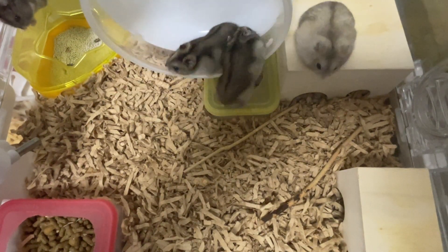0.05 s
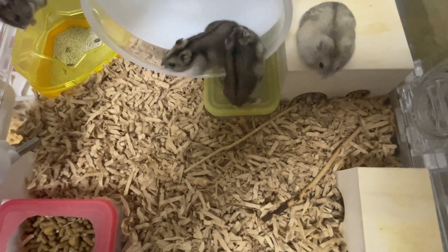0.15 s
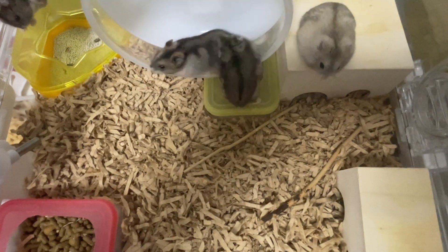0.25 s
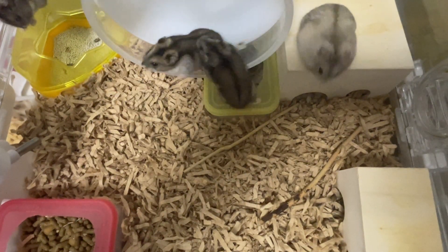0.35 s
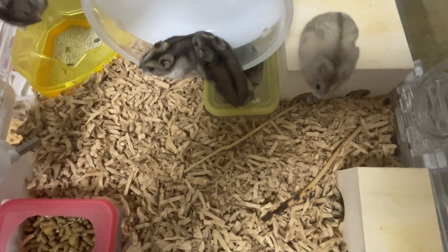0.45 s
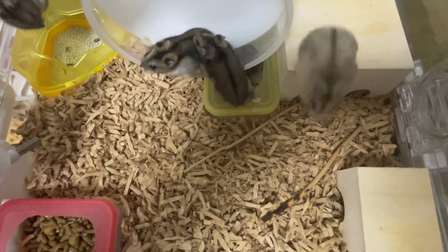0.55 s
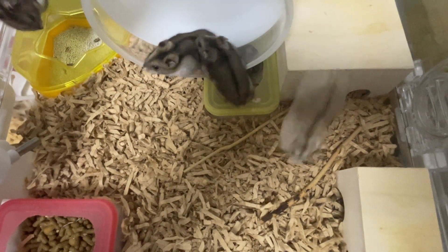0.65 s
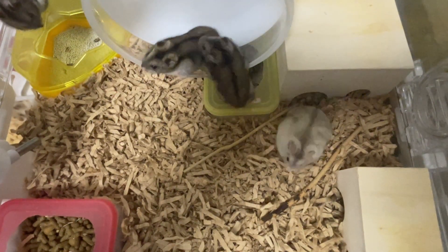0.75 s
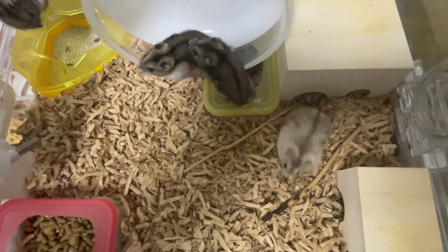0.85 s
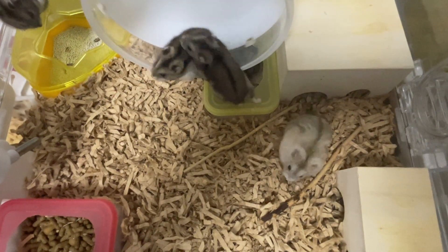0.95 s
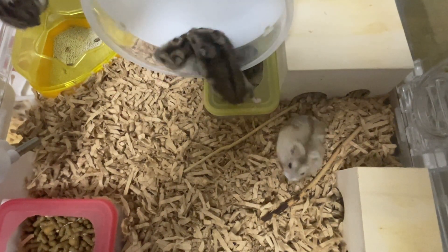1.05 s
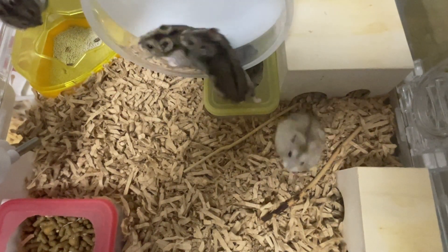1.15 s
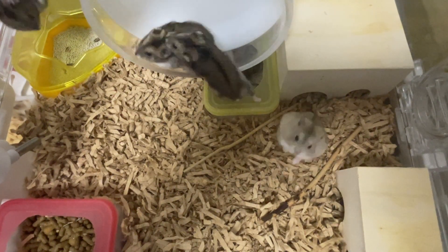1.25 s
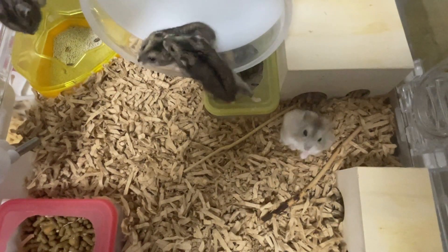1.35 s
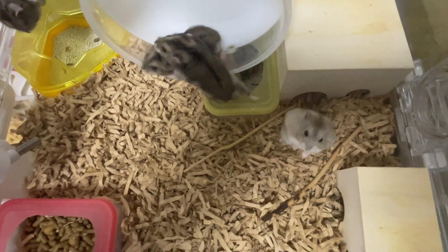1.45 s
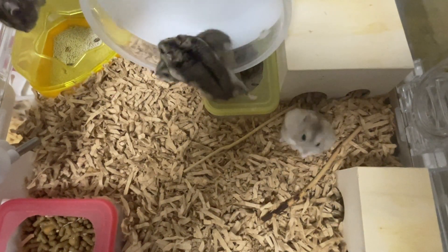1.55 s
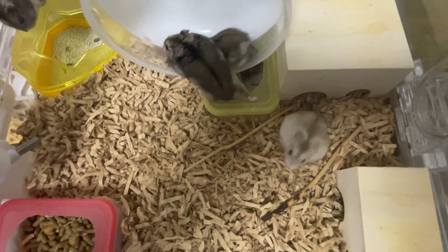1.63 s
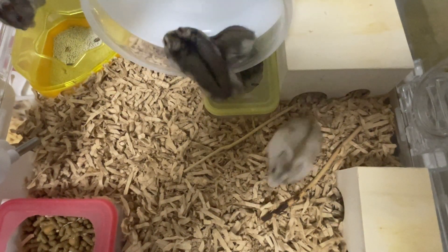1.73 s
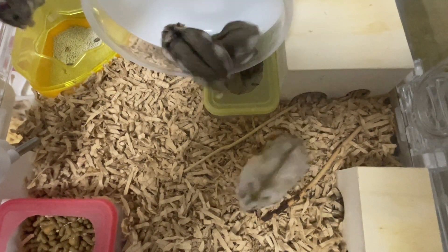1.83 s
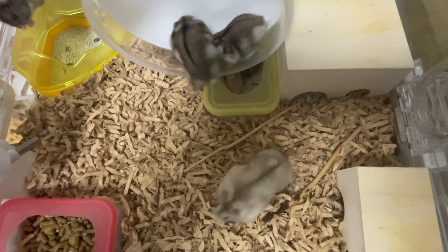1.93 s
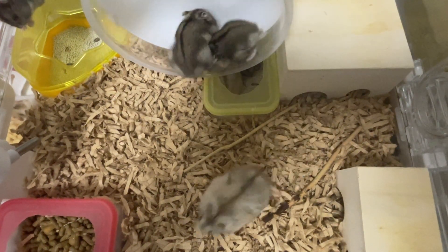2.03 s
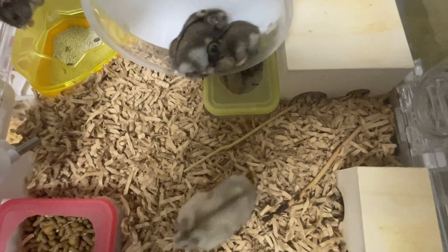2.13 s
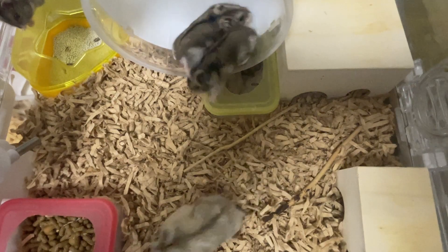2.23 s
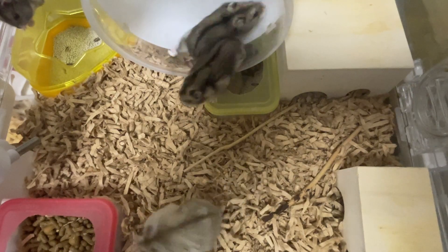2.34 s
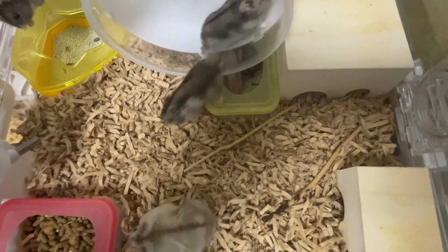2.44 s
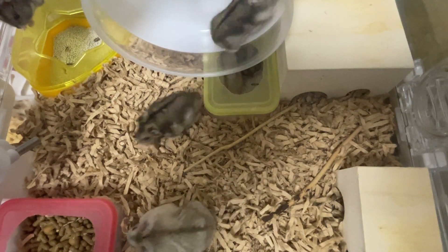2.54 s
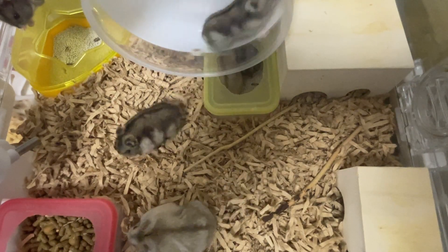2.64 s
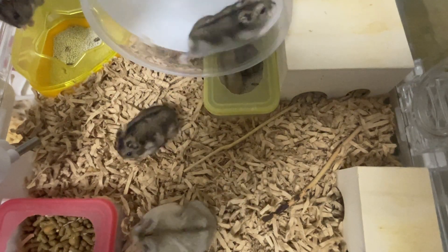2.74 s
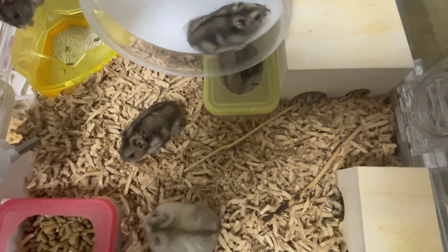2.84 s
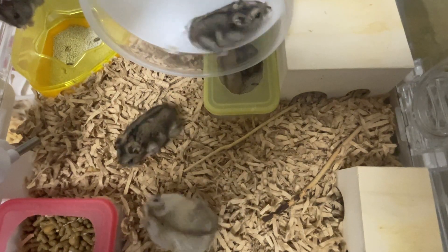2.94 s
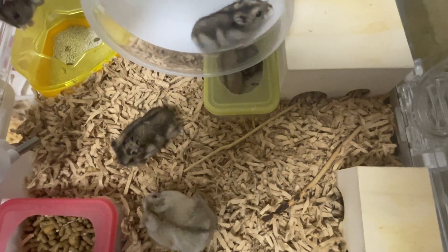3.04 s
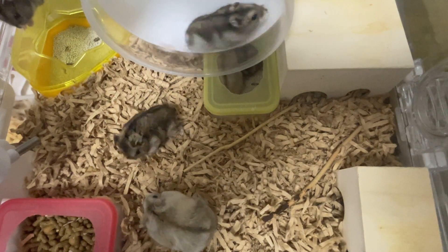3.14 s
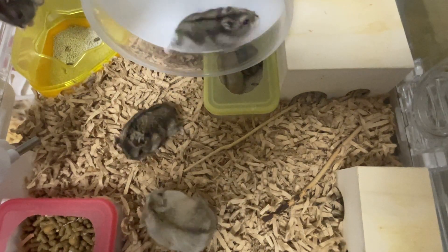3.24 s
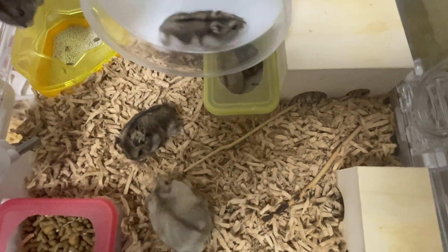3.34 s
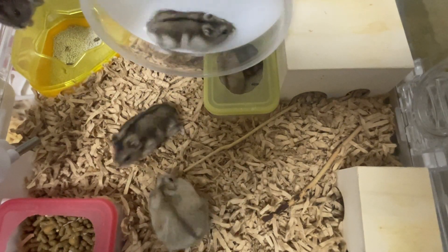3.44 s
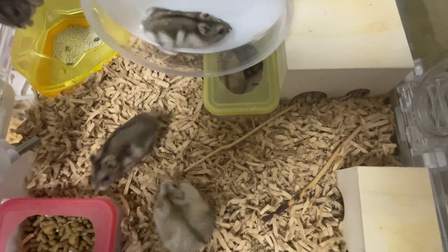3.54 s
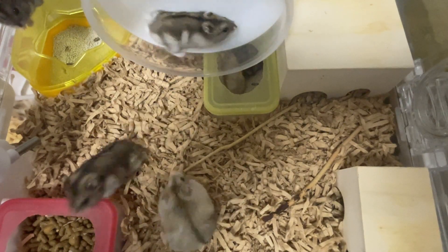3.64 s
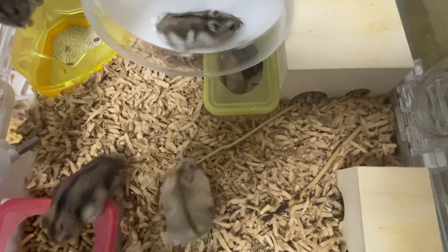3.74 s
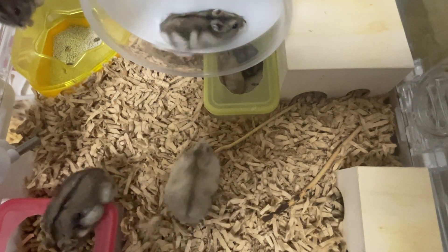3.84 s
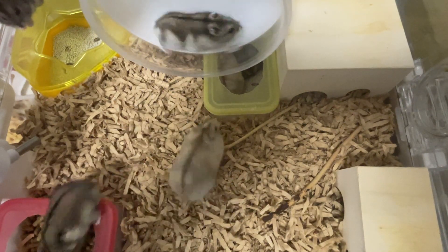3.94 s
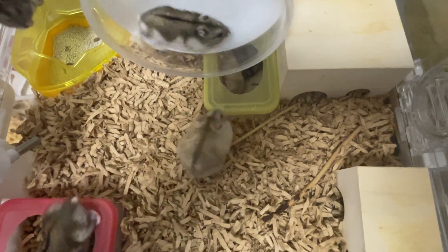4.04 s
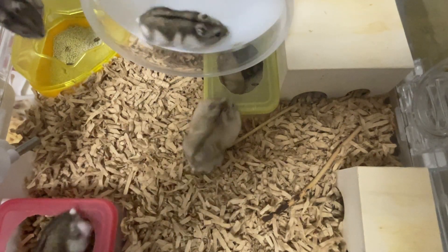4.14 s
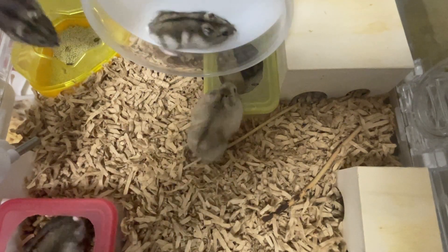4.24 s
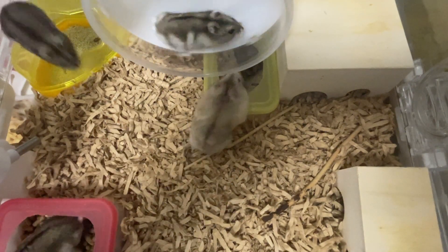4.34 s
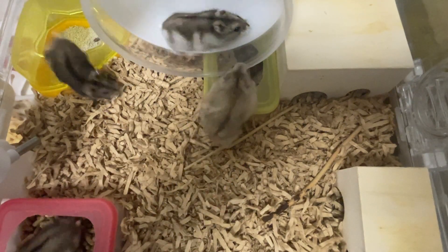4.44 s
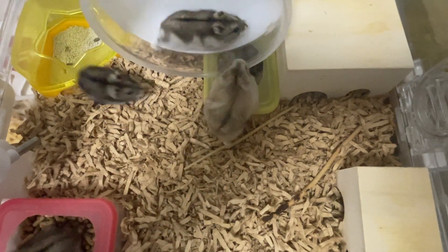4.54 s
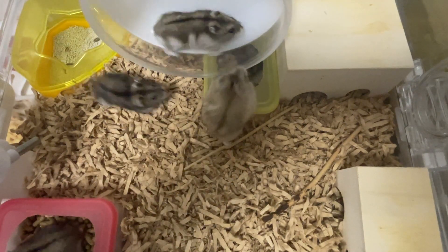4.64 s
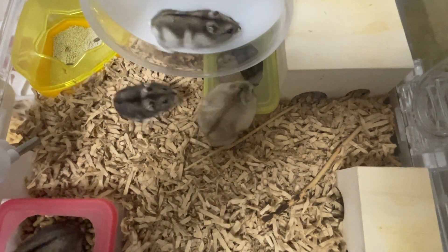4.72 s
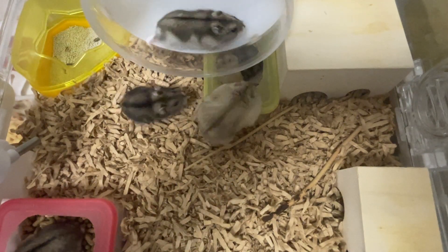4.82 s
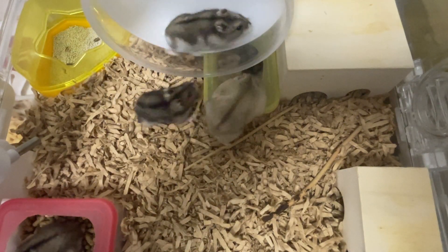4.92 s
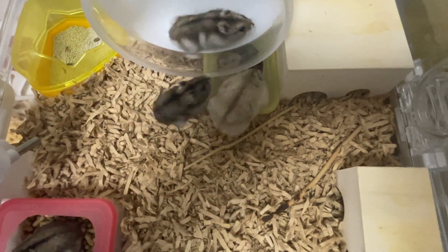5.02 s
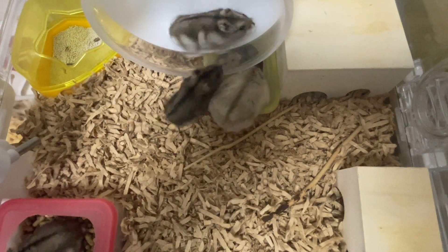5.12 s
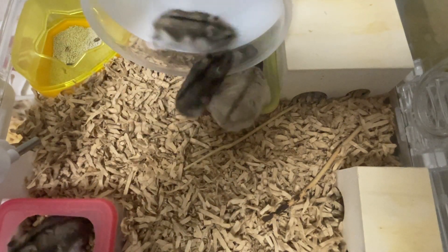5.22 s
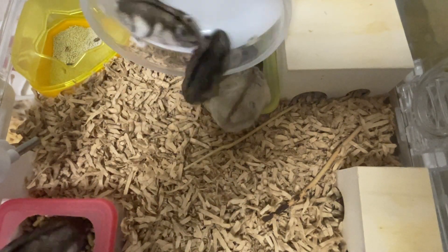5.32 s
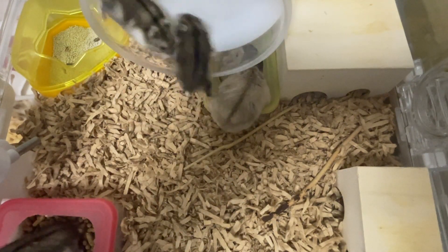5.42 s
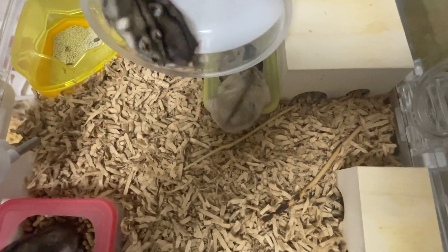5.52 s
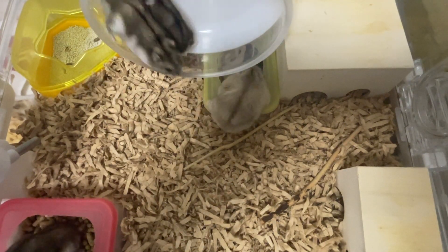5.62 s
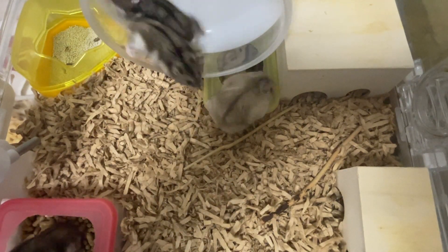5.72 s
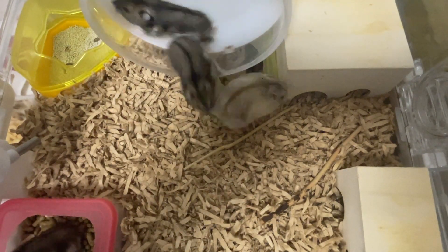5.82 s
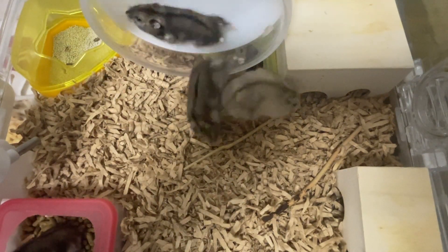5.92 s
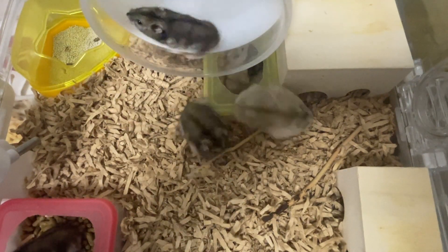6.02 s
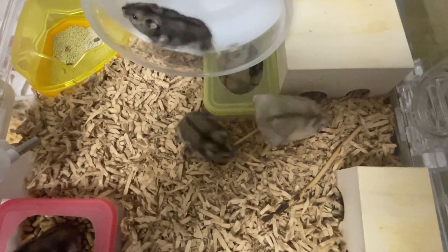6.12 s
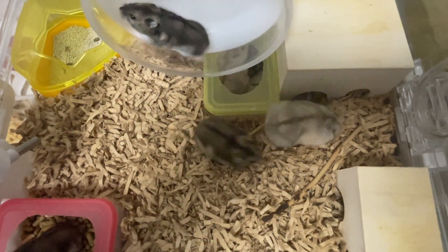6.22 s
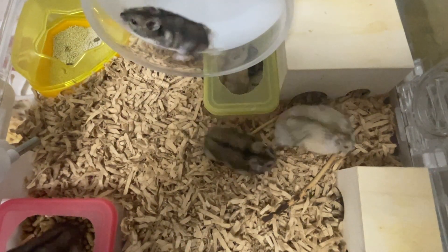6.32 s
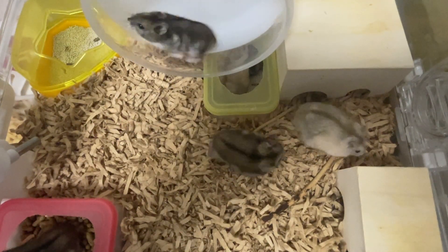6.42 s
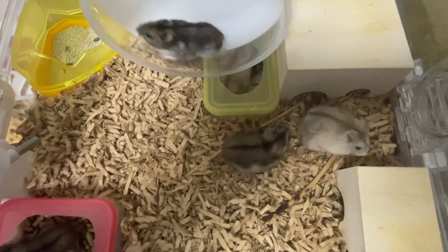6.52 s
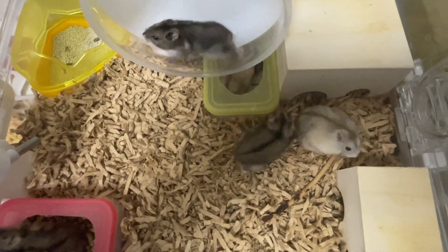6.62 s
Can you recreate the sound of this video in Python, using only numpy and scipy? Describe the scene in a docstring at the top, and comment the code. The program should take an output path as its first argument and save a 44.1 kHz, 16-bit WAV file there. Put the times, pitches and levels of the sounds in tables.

```python
"""Short hollow knocks and a dying rumble come first, then dry rustling, a hop's thud and claw ticks.
Dwarf hamsters are heard from close above: struck surfaces and floor decay as damped tones, while chips in the
bedding and air resonances are excited by random contacts. One animal jostles, then gallops on a plastic saucer
wheel: its footfalls drive the stand's resonances, its paws slap the dish and its claws tick. A faint hum persists.
Table levels are source levels, before filters, echo and the output trim."""
import sys
import numpy as np
from scipy import signal
from scipy.fft import rfft, irfft, next_fast_len
from scipy.io import wavfile
from scipy.ndimage import uniform_filter1d

SR = 44100
rng = np.random.default_rng(int(sys.argv[2]) if len(sys.argv) > 2 else 0)


def generate_wav(sig):
    """Save sig (samples, or channels by samples) to the path in sys.argv[1] as 16-bit PCM at SR."""
    pcm = np.round(np.clip(np.atleast_2d(sig).T, -1, 1) * 32767).astype(np.int16)
    wavfile.write(sys.argv[1], SR, pcm)


N = 294147
TIME = np.arange(N) / SR
AGE = np.arange(SR // 5) / SR  # window of one short event, s


def from_db(db):
    """Logarithmic level: decibels to amplitude gain."""
    return 10 ** (np.asarray(db) / 20)


def rms_one(x):
    """Normalisation: scale a signal to unit rms."""
    return x / np.sqrt(np.mean(x ** 2) + 1e-20)


def curve_at(rows, s):
    """Linear interpolation: read a (t, value) curve at the given times."""
    return np.interp(s, *np.transpose(rows))


def gains_in_time(rows):
    """Amplitude modulation: each dB column of a curve as a gain per sample."""
    s, *columns = np.transpose(rows)
    return [from_db(np.interp(TIME, s, column)) for column in columns]


def colour(x, points):
    """Minimum-phase filtering: a causal response with the given dB spectrum, via the folded cepstrum."""
    size = next_fast_len(N + 8192, real=True)
    hz, db = np.transpose(points)
    grid = np.maximum(np.fft.rfftfreq(size, 1 / SR), 1)
    log_gain = np.log(from_db(np.interp(np.log(grid), np.log(hz), db)))
    cepstrum = irfft(log_gain, size)
    cepstrum[1:size // 2] *= 2
    cepstrum[size // 2 + 1:] = 0
    response = np.exp(rfft(cepstrum))
    return irfft(rfft(x, size) * response, size)[..., :N]


def ring(x, hz, t60):
    """Damped resonance: a unit click excites a decaying sine of height about 1."""
    radius = from_db(-60 / (t60 * SR))
    angle = 2 * np.pi * hz / SR
    poles = [1, -2 * radius * np.cos(angle), radius * radius]
    return signal.lfilter([0, np.sin(angle)], poles, x + 1e-18)


def tone(hz):
    """Phase accumulation: a sine that follows a pitch given per sample."""
    return np.sin(2 * np.pi * np.cumsum(hz) / SR)


def swell(width):
    """Gaussian envelope: a smooth bump of height 1, centred in its window."""
    return np.exp(-.5 * np.minimum(((AGE - AGE[-1] / 2) / width) ** 2, 100))


def strike(rise, decay):
    """Impact envelope: fast rise and exponential fall, height 1, starting mid-window."""
    age = np.maximum(AGE - AGE[-1] / 2, 0)
    shape = (1 - np.exp(-age / rise)) * np.exp(-age / decay)
    return shape / shape.max()


def envelope(events):
    """Incoherent addition: sum the powers of (s, dB, shape) events and return the amplitude."""
    power = np.zeros(N + 2 * len(AGE))
    for s, db, shape in events:
        start = max(int(s * SR), 0)
        power[start:start + len(shape)] += (from_db(db) * shape) ** 2
    return np.sqrt(power[len(AGE) // 2:][:N])


def evened(x, seconds):
    """Automatic gain: divide by the local rms, keeping texture while the level stays near 1."""
    size = max(int(seconds * SR), 2)
    power = uniform_filter1d(uniform_filter1d(x ** 2, size), size)
    return x / np.sqrt(power + 1e-12)


def grains(per_s, spread_db, decay):
    """Shot noise: random contacts of uneven size, each a decaying noise burst; mid and side."""
    sizes = from_db(spread_db * np.minimum(rng.exponential(1, N), 4))
    energy = (rng.random(N) < per_s / SR) * sizes ** 2
    energy = signal.lfilter([1], [1, -np.exp(-2 / (decay * SR))], energy + 1e-18)
    return np.sqrt(energy) * rng.standard_normal((2, N))


# lowest and highest pitch of the loose pieces (Hz)
CHIP_LOW_HZ, CHIP_HIGH_HZ = 1170, 13530


def chatter(per_s, spread_db, t60):
    """Random modal excitation: uneven snaps each ring a piece at its own pitch; mid and side."""
    snaps = rng.random((int(per_s * N / SR), 5))
    hz = CHIP_LOW_HZ * (CHIP_HIGH_HZ / CHIP_LOW_HZ) ** snaps[:, 1:2]
    size = from_db(spread_db * np.minimum(-np.log(1 - snaps[:, 2:3]), 4)) * hz ** 0.14
    lag = np.arange(SR // 80)
    life = t60 * np.sqrt(CHIP_LOW_HZ / hz)  # higher pieces ring shorter
    decay = np.exp(-np.log(1000) * lag / (life * SR))
    rings = size * decay * np.sin(2 * np.pi * hz * lag / SR)
    at = ((snaps[:, :1] * N).astype(int) + lag).ravel()
    signs = np.sign(snaps[:, 3:].T - .5)
    return np.array([np.bincount(at, (rings * sign[:, None]).ravel(), N)[:N] for sign in signs])


PING_RISE_S = 0.0017  # time constant of the build-up


def pings(hits, low_hz, high_hz, t60, count):
    """Modal excitation: each (s, dB) hit rings a few short modes drawn at random; mid and side."""
    out = np.zeros((2, N + len(AGE)))
    for s, db in hits:
        hz = low_hz * (high_hz / low_hz) ** ((np.arange(count) + rng.random(count)) / count)
        fade = from_db(db - 60 * AGE / t60) * (1 - np.exp(-AGE / PING_RISE_S))
        modes = np.sin(2 * np.pi * np.outer(hz, AGE)) * fade
        start = int(s * SR)
        out[:, start:start + len(AGE)] += rng.choice([-1, 1], (2, count)) @ modes
    return out[:, :N]


def cage(x, echo_db, t60):
    """Reverberation: close walls add a short dense echo, different for mid and side."""
    age = np.arange(SR // 8) / SR
    echo = rng.standard_normal((2, len(age))) * from_db(-60 * age / t60) * (age > .001)
    echo /= np.sqrt(np.sum(echo ** 2, axis=1, keepdims=True))
    wet = from_db(echo_db)
    return (x + wet * signal.fftconvolve(x, echo, axes=1)[:, :N]) / np.sqrt(1 + wet ** 2)


# modes of the plastic dish: f/Hz, bandwidth/Hz, level/dB
DISH_MODES = [(417.5, 45, 7.5), (551, 6.7, 0.5), (703, 36, 6), (920, 18, -1), (987, 13, 8), (1150, 20, 4.5),
              (1329, 23, 0.5), (1530, 14.5, 8), (1640, 26, 6), (2140, 36, -4.5), (2603, 41, -16),
              (3470, 35, -2), (4163, 240, 7)]


def dish(x):
    """Modal resonance: the dish lifts its own modes out of whatever shakes it."""
    out = x.copy()
    for hz, width, db in DISH_MODES:
        r = np.exp(-np.pi * width / SR)
        zeros = np.array([1, 0, -1]) * (1 - r * r) / 2
        poles = [1, -2 * r * np.cos(2 * np.pi * hz / SR), r * r]
        out += from_db(db) * signal.lfilter(zeros, poles, x + 1e-18)
    return out


# spectrum of the room hum: f/Hz, relative level/dB
HUM = [(20, -8), (45, -3), (75, 4.5), (120, -2), (175, 0.5), (250, -12.5), (480, -20.5), (650, -28),
       (850, -25.5), (2000, -32), (6000, -46), (14000, -66)]
HUM_DB = -53


def room_hum():
    """Stationary filtered noise: a faint, mostly low room tone."""
    return from_db(HUM_DB) * rms_one(colour(rng.standard_normal((2, N)), HUM))


# murmur of the air in the tank as the animals stir: t/s, level/dB
CAVITY = [(0, -67), (.9, -62.5), (1.2, -78), (1.5, -67.5), (2.2, -68), (6.67, -73)]
# its resonances: f/Hz, level/dB, t60/s of each of two cascaded stages
CAVITY_MODES = [(626, -1.5, 0.034), (698, -7, 0.029)]


def cavity():
    """Cavity resonance: small movements keep the lowest air modes of the tank murmuring."""
    gain, = gains_in_time(CAVITY)
    stir = grains(per_s=220, spread_db=1.5, decay=.008)
    murmur = 0
    for hz, db, t60 in CAVITY_MODES:
        murmur = murmur + from_db(db) * rms_one(ring(ring(stir, hz, t60), hz, t60))
    return gain * murmur


# how busily the paws stir the bedding: t/s, crunch level/dB
BEDDING = [(0, -63.5), (.25, -70), (.42, -70), (.52, -65.5), (.9, -65.5), (1.35, -68), (1.7, -68),
           (2.02, -66), (2.25, -68.5), (2.45, -67), (2.8, -64), (3.25, -72.5), (3.55, -65), (4.1, -64.5),
           (4.4, -62.5), (4.748, -69), (5.2, -72), (5.519, -71.5), (5.7, -67.5), (6.15, -63.5), (6.67, -66)]
# quick digs and slides through the chips: t/s, crunch level/dB, swish level/dB, Gaussian width/s
SLIDES = [(0.639, -75, -45.5, 0.014), (0.722, -59, -50, 0.01), (0.79, -57.5, -60, 0.022),
          (.99, -67, -68, 0.035), (1.876, -74, -73, 0.088), (2.124, -63, -68, 0.017),
          (2.678, -62.5, -63.5, 0.048), (2.86, -59, -90, 0.013), (2.98, -54.5, -86, 0.014),
          (5.986, -63, -60.5, 0.02)]
# spectra of the crunch and of the finer swish: f/Hz, relative level/dB
CRUNCH = [(200, -48), (700, 16.5), (1300, -1.5), (2100, -9.5), (2550, 0.5), (2850, 9), (3150, 7.5),
          (3600, 1.5), (4200, 2.5), (5200, 2.5), (6400, -2.5), (8000, -15.5), (15000, -12)]
SWISH = [(500, -31), (2000, -8.5), (4500, -3), (6400, 4.5), (8100, -7.5), (9700, 3), (11500, 4),
         (13000, -6), (14500, -25.5), (16000, -16)]
SWISH_DB = -5.5  # steady swish relative to the stirring curve


def bedding():
    """Granular friction: dry chips crunch, snap and brush over one another under the paws."""
    stir, = gains_in_time(BEDDING)
    crunch_slides = envelope((s, db, swell(width)) for s, db, _, width in SLIDES)
    swish_slides = envelope((s, db, swell(width)) for s, _, db, width in SLIDES)
    crunch = from_db(-0.5) * stir + from_db(-3.0) * crunch_slides
    swish = from_db(SWISH_DB) * stir + from_db(-4.5) * swish_slides
    snaps = rms_one(chatter(per_s=700, spread_db=4.5, t60=0.023))
    brush = rms_one(grains(per_s=300, spread_db=2.0, decay=0.013))
    chips = snaps + from_db(5) * brush
    rustle = crunch * rms_one(colour(chips, CRUNCH)) + swish * rms_one(colour(chips, SWISH))
    return cage(rustle, echo_db=-8, t60=0.069)


# a paw scratches over one chip, which squeaks: t/s, level/dB, f/Hz, Gaussian width/s
SCRATCHES = [(0.216, -64, 2860, .01), (.378, -65.5, 3100, 0.01), (1.03, -63, 3180, 0.0083),
             (1.108, -59, 3200, .014), (1.423, -58.5, 2860, 0.0081), (1.528, -58, 2950, 0.015),
             (1.74, -64, 2800, 0.0076), (1.907, -68, 2600, .008), (2.006, -66, 2960, 0.014),
             (2.111, -60, 2990, .014), (2.584, -58.5, 2840, 0.017), (2.671, -62.5, 3050, 0.016),
             (2.712, -66, 3000, 0.01), (5.342, -49.5, 4150, 0.0051), (6.015, -59, 2850, 0.0061),
             (6.312, -60, 2797, .007)]
SCRATCH_T60_S = 0.0058  # of each of two cascaded resonances
SLIPS_PER_S = 1200


def scratches():
    """Stick-slip friction: a claw's uneven slips across a chip excite that chip's own resonance."""
    out = np.zeros((2, N + 2 * len(AGE)))
    for s, db, hz, width in SCRATCHES:
        slips = rng.standard_normal((2, len(AGE))) * (rng.random(len(AGE)) < SLIPS_PER_S / SR)
        resonant = ring(ring(slips, hz, SCRATCH_T60_S), hz, SCRATCH_T60_S)
        squeak = evened(resonant, seconds=0.014)
        start = int(s * SR)
        out[:, start:start + len(AGE)] += from_db(db) * swell(width) * squeak
    return out[:, len(AGE) // 2:][:, :N]


# paws scuff a hollow wall: t/s, level/dB, decay/s
SCUFFS = [(0.121, -58.5, 0.03), (0.712, -55, 0.02), (1.446, -57.5, 0.021), (3.779, -54, 0.017),
          (3.968, -52.5, 0.075), (5.264, -54, 0.025), (5.707, -57, 0.031), (5.758, -50.5, 0.02),
          (5.83, -59, 0.0081)]
# the wall's hollow spectrum: f/Hz, relative level/dB
HOLLOW = [(300, -25.5), (600, 10), (720, -2.5), (850, 0.5), (1150, 3), (1550, -5.5), (2200, -12.5),
          (8000, -57)]


def scuffs():
    """Friction noise: short rubs take on the spectrum of a hollow wall."""
    rubs = envelope((s, db, strike(rise=0.011, decay=decay)) for s, db, decay in SCUFFS)
    contacts = grains(per_s=1100, spread_db=-13.0, decay=0.0025)
    return rubs * evened(colour(contacts, HOLLOW), seconds=0.0054)


def blows(rows, side_share):
    """Coupled oscillators: a soft blow passes through two parts, so its tone swells briefly and dies."""
    out = np.zeros(N)
    for s, db, hz, t60 in rows:
        age = np.clip(TIME - s, 0, 3 * t60)
        build = age * np.log(1000) / t60
        out += from_db(db) * build * np.exp(1 - build) * np.sin(2 * np.pi * hz * age)
    return out * np.array([[1], [side_share]])


# short hollow knocks, by paws or body, on furniture, wheel or wall: t/s, level/dB, f/Hz, t60/s
KNOCKS = [(.051, -43, 660, 0.017), (.066, -36.5, 930, 0.011), (.0692, -31.5, 700, 0.014),
          (.074, -54, 704, 0.036), (.866, -47, 768, 0.016), (.883, -34.5, 690, 0.0087),
          (.8845, -37.5, 276, 0.0097), (.884, -52, 970, 0.016), (.893, -57, 680, 0.036),
          (1.448, -51, 1120, 0.01), (3.598, -43, 710, .02), (3.781, -40, 920, .018),
          (3.815, -43, 690, 0.023), (3.965, -41, 1090, 0.024), (4.784, -37.5, 637.6, 0.019),
          (4.785, -46.5, 920, 0.039), (5.713, -51.5, 691, 0.027), (5.764, -52, 1058, 0.034),
          (5.766, -61, 1165, 0.07), (5.765, -46, 719, 0.042), (5.774, -53, 1290, .014),
          (5.786, -51, 1145, 0.019), (5.835, -50, 692, 0.028), (6.119, -49, 663, 0.024)]
# hops down onto the cage floor: t/s, level/dB, f/Hz, t60/s
THUDS = [(.721, -27, 97.4, 0.063), (.723, -38.5, 162.8, 0.13), (.772, -33.5, 77.5, 0.074),
         (.783, -37.5, 158, 0.018)]


def bumps():
    """Impact sound: the knocks echo off the cage walls; the lower floor thuds stay dry."""
    knocks = cage(blows(KNOCKS, side_share=0.69), echo_db=-9.0, t60=0.16)
    return knocks + blows(THUDS, side_share=0.16)


# fainter snaps at random: rate (per s), body and edge relative to the bedding's crunch curve (dB)
SNAPS_PER_S, SNAP_BODY_DB, SNAP_EDGE_DB = 5.9, -9, -14


def small_ticks():
    """Random point process: faint chip snaps as rows of t/s, body level/dB, edge level/dB."""
    snap_s = rng.random(int(SNAPS_PER_S * TIME[-1])) * TIME[-1]
    crunch_db = curve_at(BEDDING, snap_s)
    return [(s, db + SNAP_BODY_DB, db + SNAP_EDGE_DB) for s, db in zip(snap_s, crunch_db)]


# claw ticks and snapping chips: t/s, body level/dB, edge level/dB
TICKS = [(.065, -52, -53.5), (.124, -56.5, -61), (.192, -59, -70), (.221, -75, -61), (.289, -58, -56),
         (.329, -70, -61), (.631, -71, -56), (.678, -77, -59), (.644, -62, -48.5), (.655, -71, -64),
         (.93, -63, -68), (.985, -73, -58), (1.025, -66, -66), (1.065, -56, -62), (1.094, -71, -56.5),
         (1.113, -67, -67), (1.396, -59.5, -64), (1.418, -72, -56), (1.447, -47.5, -64), (1.506, -72, -76),
         (1.524, -59, -57.5), (1.635, -61.5, -58), (1.798, -61, -65), (1.84, -62, -57.5), (1.915, -61, -61),
         (1.986, -60.5, -56.5), (2.101, -57, -70), (2.138, -58.5, -64), (2.353, -63.5, -47),
         (2.668, -68, -53.5), (2.824, -74, -53.5), (2.862, -62, -53), (2.94, -57, -60), (3.012, -53, -59.5),
         (3.048, -54.5, -60), (3.109, -59.5, -54), (3.128, -67, -57), (3.143, -53, -81), (3.174, -54, -63),
         (3.205, -58, -54), (3.241, -59, -57), (3.265, -51, -71), (3.322, -52.5, -82), (3.383, -48, -61),
         (3.43, -52, -61.5), (3.479, -48.5, -53.5), (3.506, -57.5, -77), (3.557, -50, -67),
         (3.618, -56.5, -77), (3.67, -53, -56.5), (3.726, -52, -79), (3.76, -51, -72), (3.781, -54, -76),
         (3.963, -42.5, -50.5), (4.008, -63, -72), (4.061, -47, -60), (4.215, -54, -62), (4.235, -49, -77),
         (4.256, -55, -77), (4.31, -66, -80), (4.359, -54, -79), (4.435, -53, -66), (4.458, -46.5, -56.5),
         (4.493, -54, -58.5), (4.569, -51, -64), (4.601, -55.5, -61), (4.715, -53, -64), (4.727, -49, -57),
         (4.784, -52, -83), (4.831, -51.5, -79), (4.871, -58.5, -67), (4.929, -54.5, -65),
         (4.993, -70, -74), (5.141, -49, -56.5), (5.163, -52.5, -73), (5.251, -53, -67), (5.276, -71, -80),
         (5.334, -45, -48), (5.382, -58.5, -66), (5.474, -59.5, -67), (5.639, -62, -62.5),
         (5.764, -57, -78), (5.931, -83, -54.5), (6.012, -56, -70), (6.118, -78, -68), (6.237, -63, -65),
         (6.268, -54, -59), (6.309, -53, -64), (6.366, -58.5, -60), (6.444, -69, -63), (6.497, -48, -69),
         (6.511, -46.5, -50)]
# spectrum of a claw's skid: f/Hz, relative level/dB
CLAW = [(200, -66), (500, 0), (1000, 1.5), (1500, 0), (1900, -3.5), (2200, 2.5), (2400, 4.5), (2700, 13.5),
        (3100, 9.5), (3600, 0.5), (4200, -2), (5100, -5), (6400, -4.5), (8500, -18), (15000, -61)]
TICK_PING_DB = -5.5  # ring relative to a tick's body


def ticks():
    """Hard contact: a claw's few-millisecond skid has a body, a finer edge and a ping of random modes."""
    rows = TICKS + small_ticks()
    body = envelope((s, db, strike(rise=0.0012, decay=0.0086)) for s, db, _ in rows)
    edge = envelope((s, db, strike(rise=0.0012, decay=0.0055)) for s, _, db in rows)
    catches = rms_one(chatter(per_s=1400, spread_db=12.0, t60=0.022))
    contact = catches + from_db(-5.5) * rng.standard_normal((2, N))
    skid = evened(colour(contact, CLAW), seconds=0.00096)
    grit = rms_one(colour(rng.standard_normal((2, N)), SWISH))
    hits = [(s, db + TICK_PING_DB) for s, db, _ in rows]
    ping = pings(hits, low_hz=1191, high_hz=3810, t60=0.048, count=6)
    return cage(dish(from_db(-1.0) * body * skid) + ping + edge * grit, echo_db=-5.5, t60=0.12)


# a hard kick rings the dish: t/s, f/Hz, level/dB, t60/s
KICK = [(6.513, 1515, -39.5, 0.099), (6.512, 2660, -36.5, 0.022)]


def dish_ring():
    """Free vibration: a hard kick leaves the plastic dish ringing."""
    out = np.zeros(N)
    for s, hz, db, t60 in KICK:
        click = 1. * (np.arange(N) == int(s * SR))
        out += from_db(db) * ring(click, hz, t60)
    return out * np.array([[1], [.6]])


# how hard the wheel is driven: t/s, level relative to a full gallop/dB
EFFORT = [(0, -3), (.2, -26.5), (1.6, -25.5), (1.95, -10.5), (2.3, -19.5), (2.92, -10), (3.14, -0.5),
          (3.6, 0), (4.05, 0), (4.4, -2), (4.599, -1), (4.76, -6), (4.97, -0.5), (5.22, 1), (5.451, -7.5),
          (5.6, -11), (5.9, -11), (6.0, -9), (6.199, -2), (6.67, -0.5)]
# paws slap the dish: t/s, level/dB
PAWS = [(2.947, -45), (3.009, -42), (3.063, -44), (3.121, -42), (3.177, -41), (3.264, -44), (3.323, -38),
        (3.358, -42.5), (3.417, -37), (3.477, -41.5), (3.536, -38), (3.596, -41.5), (3.67, -43),
        (3.702, -40.5), (3.779, -49), (3.813, -37), (3.868, -40.5), (3.924, -58), (3.98, -43),
        (4.036, -37.5), (4.071, -44), (4.1, -43), (4.161, -46), (4.228, -41.5), (4.257, -43), (4.286, -43),
        (4.41, -43), (4.47, -38.5), (4.529, -38.5), (4.597, -42.5), (4.784, -48.5), (4.927, -38.5),
        (4.991, -39.5), (5.053, -41), (5.136, -39), (5.196, -50), (5.263, -38.5), (5.312, -48),
        (5.712, -66), (5.766, -47), (5.835, -51), (5.966, -45), (6.005, -51), (6.119, -43.5), (6.177, -50),
        (6.241, -44), (6.273, -43.5), (6.307, -65), (6.376, -47.5), (6.416, -54), (6.444, -41),
        (6.503, -38.5), (6.571, -39), (6.628, -43)]
# spectrum of the slaps and the rattle: f/Hz, relative level/dB
PATTER = [(200, -18.5), (330, 2.5), (420, -1), (510, 0.5), (620, 4.5), (715, 0.5), (800, -2.5),
          (1050, -8.5), (1550, -13.5), (1900, -15), (2900, -19), (5000, -44.5), (9000, -40), (15000, -68)]
SLAP_DB, PAW_PING_DB = -9.5, -4.5  # slap body relative to the paw table; ring relative to that body
ROLLING_DB, ROLLING_FOLLOWS = -56.5, 1.5  # axle rattle at a full gallop (dB); dB gained per dB of effort
# stray taps: rate (per s), level at a full gallop (dB), dB gained per dB of effort, scatter (+/- dB)
TAPS_PER_S, TAP_DB, TAP_FOLLOWS, TAP_SCATTER_DB = 5, -57, 1.1, 3


def patter():
    """Forced and free vibration: slaps and a fine axle rattle drive the dish, and short modes ring on."""
    rolling = from_db(ROLLING_DB + ROLLING_FOLLOWS * curve_at(EFFORT, TIME))
    skin = evened(colour(rng.standard_normal((2, N)), PATTER), seconds=0.0048)
    contacts = grains(per_s=320, spread_db=2.0, decay=0.0019)
    rattle = evened(colour(contacts, PATTER), seconds=0.016)
    when, strength = rng.random((int(TAPS_PER_S * TIME[-1]), 2)).T
    tap_s = when * TIME[-1]
    tap_db = TAP_DB + TAP_FOLLOWS * curve_at(EFFORT, tap_s) + TAP_SCATTER_DB * (2 * strength - 1)
    touches = [(s, db + SLAP_DB) for s, db in PAWS] + list(zip(tap_s, tap_db))
    slaps = envelope((s, db, strike(rise=0.00074, decay=0.017)) for s, db in touches)
    hits = [(s, db + PAW_PING_DB) for s, db in touches]
    knock = pings(hits, low_hz=293, high_hz=980, t60=0.095, count=4)
    return dish(slaps * skin + rolling * rattle) + knock


# each footfall of the rider: t/s, upper note level/dB, upper note f/Hz, lower note level/dB
STEPS = [(2.961, -43, 171.4, -60), (3.033, -42, 141.8, -46.0), (3.087, -35.5, 165.8, -45),
         (3.138, -37, 157, -38), (3.195, -36, 157.4, -38.5), (3.253, -39.5, 157, -57),
         (3.314, -34.5, 161.7, -43.5), (3.385, -33.5, 195.7, -52), (3.437, -33.5, 157.4, -41),
         (3.494, -33, 157.6, -40), (3.552, -37.5, 161, -37), (3.608, -34.5, 158.8, -40),
         (3.661, -38.5, 170.2, -38), (3.718, -33.5, 170, -35.5), (3.772, -41, 174.6, -36),
         (3.823, -36, 148.9, -33), (3.888, -31.5, 171.2, -35.5), (3.998, -31.5, 158.9, -31),
         (4.056, -31, 161.4, -39.5), (4.117, -33.5, 166, -43), (4.178, -32, 160.1, -56),
         (4.245, -30.5, 153, -45), (4.306, -31.5, 153.6, -52), (4.371, -51, 185.3, -51.5),
         (4.425, -37.5, 157, -50.0), (4.49, -32.5, 162.7, -44), (4.544, -34.5, 153, -49),
         (4.616, -35, 167, -48.0), (4.676, -35, 161.5, -43), (4.83, -38.5, 160, -41),
         (4.906, -37.5, 159.8, -52), (4.953, -36.5, 186.2, -48), (5.034, -37.5, 153.6, -40),
         (5.075, -43, 153, -37.5), (5.114, -39, 174.3, -35.5), (5.151, -36, 159.5, -49),
         (5.213, -32.5, 157, -42), (5.255, -41, 159.8, -44), (5.288, -40, 193.2, -42),
         (5.363, -45, 186, -48), (5.417, -49, 186, -41), (5.669, -40, 148.2, -44.5),
         (5.808, -42.5, 163.1, -41.5), (5.866, -46, 186, -39.5), (6.033, -39.5, 172.8, -62),
         (6.086, -44.0, 172, -39.5), (6.124, -36, 162, -36), (6.199, -37, 163.4, -38.5),
         (6.258, -33, 148.9, -50), (6.321, -38.5, 149.4, -36.5), (6.395, -32.5, 161.5, -40),
         (6.461, -34.5, 159.8, -54), (6.521, -38.0, 167, -38), (6.585, -32, 161, -44),
         (6.65, -28.5, 159.4, -41)]
# the rider shifts its weight on the resting wheel: t/s, level/dB
JOSTLES = [(1.361, -48), (1.932, -47), (2.556, -51.5), (2.666, -46.5)]
# resonances of the wheel on its stand: f/Hz, bandwidth/Hz, level/dB
STAND = [(48.4, 4.2, -7.5), (88, 32, -5), (157, 43.6, -6.5), (210, 20.6, -5), (263, 72, -14)]
RUMBLE_DB = -44  # bearing rumble at a full gallop
SHAKE_DB = -7.5  # shake of the stand relative to a step's upper note


def wheel():
    """Broadband excitation of resonances: steps shake the stand; between them the bearing rumbles on."""
    rumble = from_db(RUMBLE_DB + curve_at(EFFORT, TIME))
    loads = [(s, db + SHAKE_DB) for s, db, _, _ in STEPS] + JOSTLES
    load = envelope((s, db, swell(width=0.017)) for s, db in loads)
    shake = rng.standard_normal((2, N))
    stand = np.zeros((2, N))
    for k, (hz, width, db) in enumerate(STAND):
        t60 = np.log(1000) / (np.pi * width)
        mode = rms_one(ring(shake, hz, t60))
        stand += from_db(db) * np.sqrt(width) * mode * (-1) ** k  # neighbours in opposite phase
    low = evened(stand, seconds=0.032) * np.hypot(from_db(-1.0) * load, rumble)
    return signal.sosfilt(signal.butter(3, [38, 320], "band", fs=SR, output="sos"), low)


# pitch of the stand's lower note, which drops when the rider turns round: t/s, f/Hz
LOW_PITCH = [(3.1, 83), (3.45, 83.05), (3.78, 91.5), (4.15, 88), (5.1, 90.6), (5.3, 87.7), (5.5, 72.6),
             (6.67, 72.6)]
# deep sway tone of the stand: t/s, f/Hz, rms level/dB
SWAY_NOTE = [(2.9, 49.5, -65), (3.1, 51, -55), (3.5, 51.05, -46), (3.8, 50.36, -59), (4.2, 47.7, -53),
             (4.9, 47.7, -52), (5.25, 46.8, -45), (5.5, 46.5, -55), (6.1, 44.6, -56), (6.3, 46.55, -50),
             (6.67, 47.4, -53)]


def thumps():
    """Driven oscillation: every footfall pumps two notes of the stand for a few cycles over a sway tone."""
    upper_pitch = curve_at([(s, hz) for s, _, hz, _ in STEPS], TIME)
    upper = envelope((s, db, swell(width=0.013)) for s, db, _, _ in STEPS) * tone(upper_pitch)
    lower_pitch = curve_at(LOW_PITCH, TIME)
    lower = envelope((s, db, swell(width=0.03)) for s, _, _, db in STEPS) * tone(lower_pitch)
    s, hz, db = np.transpose(SWAY_NOTE)
    sway = from_db(np.interp(TIME, s, db)) * np.sqrt(2) * tone(np.interp(TIME, s, hz))
    return (from_db(-0.64) * upper + from_db(-3.3) * lower + sway) * np.array([[1], [.3]])


# stereo width, as a filter on the side signal: f/Hz, gain/dB
WIDTH = [(60, -14), (170, -10), (380, -1), (700, -1), (1300, 5.5), (2400, 0), (4400, -0.5), (8100, 1),
         (11000, -11), (14000, 11.5)]
# stereo balance: f/Hz, left gain minus right gain/dB
LEAN = [(30, -1.5), (120, 4.5), (260, -0.1), (700, 0), (2000, 2.5), (4000, 3.5), (8000, 5.5), (13000, -1)]


def scene():
    """Superposition: all sources add as mid and side, then spread to left and right."""
    surroundings = room_hum() + cavity() + bedding() + scratches() + scuffs() + bumps()
    running = ticks() + dish_ring() + patter() + wheel() + thumps()
    mid, side = surroundings + running
    side = colour(side, WIDTH)
    left = colour(mid + side, [(hz, db / 2) for hz, db in LEAN])
    right = colour(mid - side, [(hz, -db / 2) for hz, db in LEAN])
    return from_db(-1.4) * np.array([left, right])


CUTOFF_HZ = 15900


def record(dry):
    """Band limitation: a steep elliptic low-pass cuts the top."""
    return signal.sosfilt(signal.ellip(10, .2, 80, CUTOFF_HZ, fs=SR, output="sos"), dry)


dry = scene()
out = record(dry)
generate_wav(out)
```